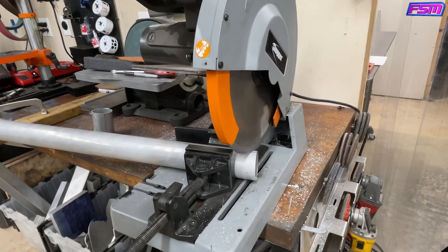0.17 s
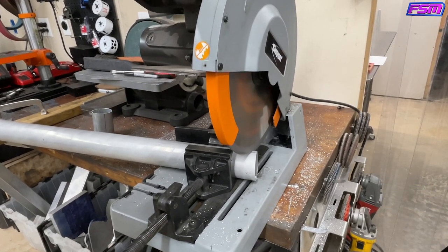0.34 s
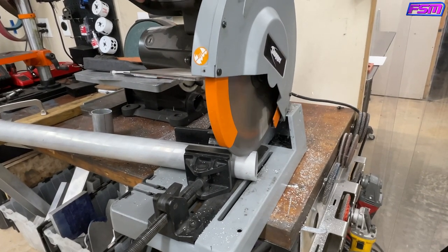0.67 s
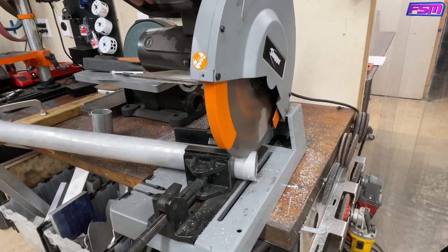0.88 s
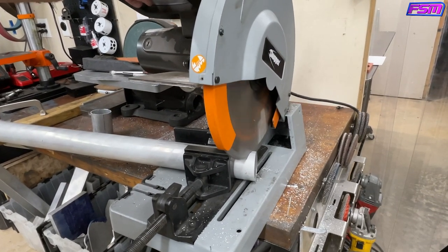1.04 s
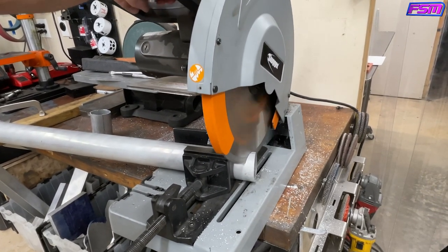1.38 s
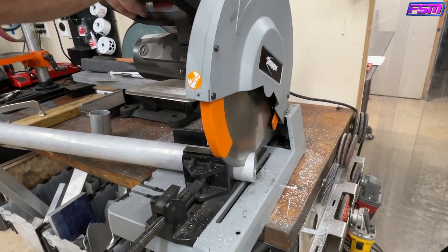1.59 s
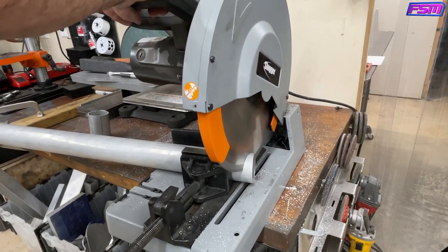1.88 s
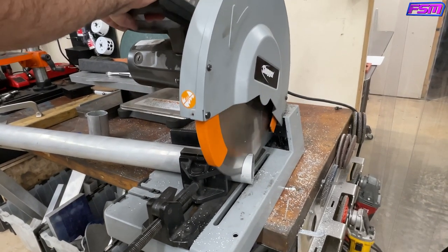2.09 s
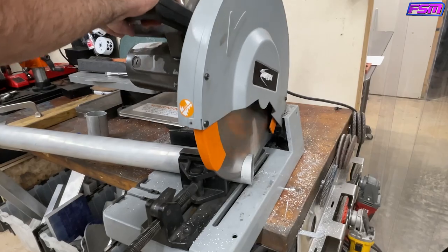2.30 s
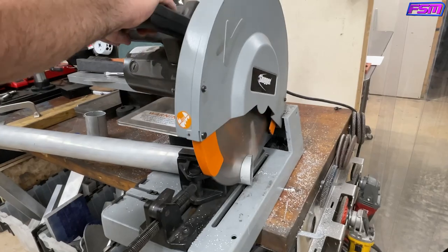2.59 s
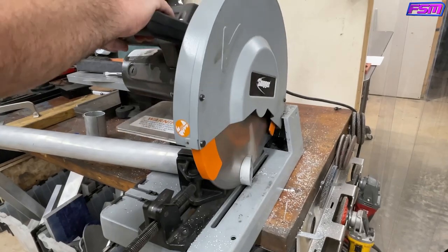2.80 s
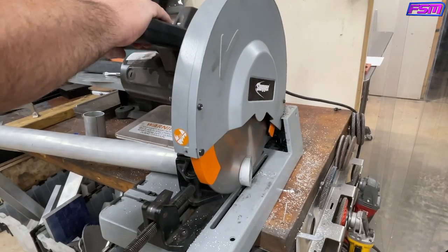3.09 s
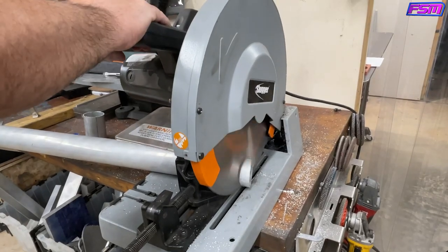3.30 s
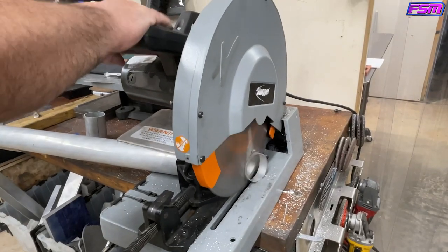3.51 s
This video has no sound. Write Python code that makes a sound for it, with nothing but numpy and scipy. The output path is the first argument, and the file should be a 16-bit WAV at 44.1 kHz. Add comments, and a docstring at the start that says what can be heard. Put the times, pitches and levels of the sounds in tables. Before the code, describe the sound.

In a workshop, close and mono, a chop saw cuts aluminum tubing: light buzzing contact, loud shrill tooth whine with hissing chips and shifting squeals, short falling screech as the offcut breaks off, then windy motor noise.

```python
"""Toothed saw cutting an aluminium tube

Saw teeth strike at a steady rate and sing overtones that throb once a blade turn: sines with partly random gain.
Chips hiss and the tube rings: coloured noise and noise-fed resonances. At break-through the pitch sags in a short
screech, torn metal crackles and the offcut snaps free as decaying sines. Motor and blade wind, heard throughout as
noise, hum and steady tones, are left at the end. One microphone."""
import sys
import numpy as np
from scipy import signal
from scipy.fft import rfft, irfft, next_fast_len
from scipy.io import wavfile
from scipy.ndimage import uniform_filter1d, map_coordinates

SR = 44100
rng = np.random.default_rng(int(sys.argv[2]) if len(sys.argv) > 2 else 0)


def inscribe(sig):
    """Save sig as 16-bit PCM at rate SR to the path in sys.argv[1].

    A 1-D sig is mono; a 2-D sig holds one channel per row.
    Samples are clipped to [-1, 1] before scaling.
    """
    pcm = np.round(np.clip(np.atleast_2d(sig).T, -1, 1) * 32767)
    wavfile.write(sys.argv[1], SR, pcm.astype(np.int16))


N = 160965
TIME_S = np.arange(N) / SR


def amp(db):
    """Decibels to linear gain."""
    return 10 ** (np.asarray(db) / 20)


def unit(x):
    """Scale to rms 1."""
    return x / np.sqrt(np.mean(x ** 2) + 1e-20)


def curves(rows):
    """One value per sample for each column after the time."""
    knots_s, *columns = np.transpose(rows)
    return [np.interp(TIME_S, knots_s, column) for column in columns]


def between(start_s, end_s):
    """1 from start to end, with 10 ms fades."""
    gate = 1. * (TIME_S >= start_s) * (TIME_S < end_s)
    return uniform_filter1d(gate, size=441, mode="nearest")


def inside(rows):
    """1 while a table lasts, with 10 ms fades."""
    return between(rows[0][0], rows[-1][0])


def wobble(knots_hz):
    """Smooth random curve through random knots."""
    knots = rng.standard_normal(int(N * knots_hz / SR) + 4)
    return map_coordinates(knots, [np.arange(N) * knots_hz / SR])


def filtered(x, response):
    """x times a complex response of frequency."""
    size = next_fast_len(N + SR // 2)
    spectrum = rfft(x, size) * response(np.fft.rfftfreq(size, 1 / SR))
    return irfft(spectrum, size)[..., :N]


def noise(spectrum, patchy_db):
    """Coloured noise of rms 1 with time-frequency patches of random gain."""
    knots_hz, knots_db = np.transpose(spectrum)
    cells = signal.stft(rng.standard_normal(N), nperseg=512)[2]
    patches = uniform_filter1d(rng.standard_normal(cells.shape), size=2, axis=0)
    patches = uniform_filter1d(patches, size=7, axis=1)
    patchy = signal.istft(cells * amp(patchy_db * unit(patches)), nperseg=512)[1][:N]
    return unit(filtered(patchy, lambda hz: amp(np.interp(np.log(hz + 1), np.log(knots_hz + 1), knots_db))))


def band(center_hz, width_hz):
    """Noise of rms 1 through one narrow resonance, applied twice."""
    def response(hz):
        damping = 1j * hz * width_hz
        return (damping / (center_hz ** 2 - hz ** 2 + damping)) ** 2
    return unit(filtered(rng.standard_normal(N), response))


def ringing(modes, fade_db, knots_hz):
    """Noise-fed resonances, each fading in and out on its own."""
    return sum(amp(db + fade_db * wobble(knots_hz)) * band(hz, width_hz) for hz, width_hz, db in modes)


def tone(cycles, level_db, rough, knots_hz):
    """Sine whose power share `rough` has random strength and phase, breaking it into beads."""
    random_gain = unit(wobble(knots_hz)) + 1j * unit(wobble(knots_hz))
    gain = np.sqrt(1 - rough) + np.sqrt(rough / 2) * random_gain
    carrier = np.exp(2j * np.pi * (cycles + rng.random()))
    return np.sqrt(2) * amp(level_db) * (gain * carrier).real


# tooth strikes: (time [s], rate [teeth/s])
TOOTH_RATE = [(0, 1820), (.3, 1826), (.5, 1824), (.85, 1827), (1.0, 1830), (1.15, 1836), (1.45, 1840),
              (2.1, 1840), (2.3, 1835), (2.55, 1831), (2.76, 1818), (2.9, 1808), (3.0, 1802), (3.1, 1792),
              (3.17, 1786), (3.23, 1765)]


def tooth_cycles():
    """Running count of tooth strikes: phase of the tooth-rate fundamental."""
    return np.cumsum(curves(TOOTH_RATE)[0]) / SR


# cut strength: (time [s], chip hiss level before gain [dB], treble hiss level before gain [dB], throb [dB])
CUT = [(0, -54, -70, 2.5), (.04, -58.5, -72, 6.5), (.45, -51.5, -60, 3.5), (.7, -50.5, -60, 2.5),
       (1.0, -47, -59.5, 1.5), (1.3, -45, -55.5, 2), (1.56, -45.5, -55.5, 1.5), (1.75, -45.5, -53, 1.5),
       (1.9, -45.5, -53.5, 1), (2.1, -49, -54.5, 1), (2.33, -45.5, -55.5, 0.5), (2.45, -44, -55.5, 0.5),
       (2.6, -45.5, -56.5, 0.5), (2.8, -46.5, -58, 1), (3.05, -49, -61.5, 1.5), (3.21, -46.5, -60, 2.5),
       (3.245, -44.5, -56, 2), (3.32, -46, -58.5, -3.5), (3.36, -44.5, -58, 1), (3.4, -51.5, -67, 0),
       (3.46, -62, -82, -2)]
TOOTH_COUNT, TURN_START_TURNS = 90, 0.061


def blade_throb(cycles, throb_db):
    """Run-out of the blade: level swing in dB, one cosine a turn."""
    return throb_db * np.cos(2 * np.pi * (cycles / TOOTH_COUNT + TURN_START_TURNS))


# tooth tones: (time [s], level of overtones 1 to 8 [dB] x 8, of lower half-way tones [dB], of upper ones [dB])
TEETH = [(0.0, -57, -50, -51, -51, -59, -61, -68, -67, -61, -62),
         (0.02, -60, -56, -60.5, -59, -70, -70, -78, -73, -67, -59),
         (0.29, -39, -53.5, -54, -57, -71, -67, -71, -66, -67, -62),
         (0.41, -47.5, -48.5, -67, -48.5, -66, -61, -61, -61, -66, -67),
         (0.53, -32.5, -45.5, -58, -57, -68, -52, -72, -49, -69, -57),
         (0.66, -36.5, -40, -44, -52, -48, -49, -55, -55, -61, -58),
         (0.73, -43, -42, -43.5, -49, -59, -49, -51, -46, -59, -57),
         (0.81, -30.5, -37.5, -43, -46, -50, -50, -53, -43, -53, -52),
         (0.84, -30, -38, -42, -47, -54, -46, -44, -42, -54, -54),
         (0.91, -31, -40.5, -39, -51, -53, -50, -52, -46, -55, -57),
         (1.0, -35, -37, -45, -46, -50, -61, -46, -44, -51, -60),
         (1.04, -45, -38.5, -31, -46.5, -49, -43, -44, -50, -46, -57),
         (1.2, -32.5, -39.5, -36.5, -38, -42, -63, -61, -40, -44, -54),
         (1.21, -32.5, -52, -33, -46, -40, -49, -50, -45, -49, -52),
         (1.27, -31.5, -54, -55, -38.5, -58, -65, -58, -43, -48, -60),
         (1.34, -32, -52, -32, -45, -54, -44, -50, -40, -41, -43),
         (1.37, -31, -50, -34, -44, -42, -44, -55.5, -40, -39, -42),
         (1.44, -32, -36.5, -32, -32, -43, -47, -51, -50, -44, -46),
         (1.49, -32.5, -39.5, -42, -40, -46, -51, -59, -48, -51, -51),
         (1.53, -33, -40, -39.5, -34, -38.5, -41, -47, -47, -50, -52),
         (1.58, -36, -40, -34.5, -45, -53, -49, -55, -45, -49, -51),
         (1.63, -30, -41, -35, -32, -43, -42.5, -48, -48, -47, -53),
         (1.75, -38, -34, -46, -29, -41.5, -36, -44, -30, -45, -43.5),
         (1.81, -32, -32, -33.5, -30.5, -44, -40, -54, -35, -39, -48),
         (1.87, -27.5, -47, -27, -35.5, -47, -37.5, -44, -36, -44, -53),
         (1.93, -46, -48, -32, -41, -40, -48, -50, -41, -44, -51),
         (2.02, -45.5, -39.5, -53, -47, -43.5, -47, -53, -54, -45, -42),
         (2.14, -51, -36, -37.5, -30.5, -47, -47, -63, -49, -40, -52),
         (2.3, -54, -33.5, -35.5, -37.5, -48, -46, -57, -44, -47, -54),
         (2.34, -50, -35, -31.5, -34, -47, -33.5, -44, -45, -41, -40),
         (2.38, -34.5, -54, -29.5, -39, -46, -53, -55, -51, -39, -43),
         (2.42, -38, -45, -32.5, -37.5, -46, -45, -54, -39, -45, -39),
         (2.55, -33.5, -35.5, -35, -37.5, -54, -42.5, -55, -39, -41, -55),
         (2.59, -36, -34.5, -41, -32.5, -46, -49, -49, -40, -39, -53),
         (2.64, -37, -40.5, -36, -35.5, -48, -47, -54, -43, -41, -56),
         (2.72, -34.5, -27.5, -41.5, -38, -44, -39, -48, -39, -35, -51),
         (2.75, -33.5, -31.5, -31.5, -30.5, -33.5, -43, -38, -38, -47, -43),
         (2.77, -30.5, -33.5, -44, -44, -38, -43, -49, -44, -48, -54),
         (2.85, -38, -37.5, -33.5, -41, -37, -42.5, -49, -38, -52, -57),
         (2.89, -38, -39, -33, -49, -54, -47, -50, -55, -54, -45),
         (2.96, -39.5, -33.5, -44, -65, -54, -43.5, -52, -49, -54, -37),
         (3.02, -48.5, -31, -51, -49, -43.5, -44, -63, -44, -61, -46),
         (3.09, -44.5, -42.5, -47, -37.5, -54, -59, -58, -47, -48, -61),
         (3.23, -47.5, -49, -50, -63, -63, -58, -63, -51, -50, -57)]
# overtones: (multiple of tooth rate, throb depth [factor], roughness [0-1])
OVERTONES = [(1, 1.4, .01), (2, 1.5, .05), (3, 1.9, .05), (4, 1.4, .07), (5, 2.0, .16), (6, 1.7, .16),
             (7, 1.7, .2), (8, 1.5, .1)]
# lower half-way tones: (multiple of tooth rate, relative level [dB])
HALVES_LOW = [(1.5, -13.5)]
# upper half-way tones: (multiple of tooth rate, relative level [dB])
HALVES_HIGH = [(5.5, -6), (6.5, -18), (7.5, -15), (8.5, -11)]


def tooth_tones(cycles, throb):
    """Periodic strikes: overtones of the tooth rate plus half-way tones, with the blade throb."""
    *overtones_db, low_db, high_db = curves(TEETH)
    out = np.zeros(N)
    for (k, depth, rough), db in zip(OVERTONES, overtones_db):
        # level unsteadiness grows with the multiple
        level_db = db + depth * throb + 0.21 * k * wobble(35.05)
        out += tone(k * cycles, level_db, rough, knots_hz=95)
    for stack_db, stack in ((low_db, HALVES_LOW), (high_db, HALVES_HIGH)):
        for k, db in stack:
            out += tone(k * cycles, stack_db + db + throb, rough=.2, knots_hz=60)
    return inside(TEETH) * out


# half-way squeals: (time [s], level at each of the three multiples [dB] x 3)
SQUEALS = [(0, -68, -72, -79), (.55, -57, -66, -73), (.8, -62, -53, -70), (1.05, -54, -51, -55),
           (1.25, -43.5, -52, -50), (1.4, -46, -52, -56), (1.55, -57, -48, -50), (1.68, -49, -48, -53),
           (1.85, -46, -45, -53), (1.97, -54, -46, -43), (2.1, -47, -45, -50), (2.26, -39, -46, -48),
           (2.33, -47, -42, -41), (2.42, -52, -38, -48), (2.52, -49, -40, -56), (2.59, -39, -30.5, -55),
           (2.67, -48, -35, -52), (2.75, -49, -50, -51), (2.86, -47, -57, -68), (3.0, -62, -59, -60),
           (3.23, -60, -53, -60)]
# (multiples of tooth rate)
SQUEAL_MULTIPLES = (2.5, 3.5, 4.5)


def squeals(cycles, throb):
    """Half-way tones of the tooth rate that swell on their own."""
    tones = sum(tone(k * cycles, db + throb, rough=.12, knots_hz=60)
                for k, db in zip(SQUEAL_MULTIPLES, curves(SQUEALS)))
    return inside(TEETH) * tones


# lines that sound for a while during the cut: (start [s], end [s], frequency [Hz], unsteadiness [Hz], level
# [dB])
RINGS = [(0, 1.2, 3816, 10, -58), (0, 0.227, 3360, 40, -55), (3.462, 3.593, 289, 30, -74),
         (0, 1.1, 2200, 13.2, -57), (0.343, 1.145, 3213, 46.1, -48), (0.304, 1.308, 2596, 19, -55.5),
         (0.353, 0.737, 5050, 26, -51.5), (.38, .9, 6900, 23, -62), (1.12, 1.45, 5150, 36, -47),
         (1.248, 1.9, 6060, 50, -47.5), (1.54, 1.608, 2760, 25, -47), (1.91, 2.007, 2750, 34, -46),
         (2.016, 2.246, 5095, 30, -48), (2.08, 2.247, 4100, 52, -47), (2.2, 2.35, 6860, 40, -45),
         (2.5, 3.05, 6130, 17, -60), (.35, .65, 10420, 31, -58.5), (1.35, 1.65, 10560, 50, -52),
         (1.85, 2.2, 10540, 63, -48), (2.653, 3.1, 2180, 19, -48.5), (2.676, 3.084, 2696, 34.6, -51.5),
         (2.81, 2.98, 3333, 33, -46.5), (3.14, 3.217, 4200, 30, -56), (3.134, 3.3, 6940, 46, -50),
         (3.236, 3.285, 5940, 46, -38.5), (3.238, 3.27, 8390, 92, -40.5), (3.257, 3.314, 6750, 58, -45),
         (3.39, 3.463, 6030, 8, -53), (3.53, 3.6, 6020, 11.95, -60), (3.205, 3.42, 260, 52, -69.5)]


def passing_lines(throb):
    """Lines that sound for a while during the cut: unsteady sines at fixed pitch."""
    return sum(between(start_s, end_s) * tone(hz * TIME_S, db + 1.8 * throb, rough=.3, knots_hz=2 * unsteady_hz)
               for start_s, end_s, hz, unsteady_hz, db in RINGS)


# chip spectrum: (frequency [Hz], relative density [dB per Hz])
CHIPS = [(530, -44.5), (900, -34), (995, -9), (1620, -22), (1820, -2), (2950, -18), (3580, -3), (3890, -8),
         (5400, -4.5), (8000, -13), (10400, -22), (17600, -120)]
# tube modes: (frequency [Hz], width [Hz], relative level [dB])
TUBE = [(1704, 134, -13.5), (3248, 300, -10.5), (4140, 64, -8.5), (5880, 67, -18.5)]
CHIPS_GAIN_DB, TUBE_GAIN_DB = 7.5, 3


def chips_and_tube(hiss_db, throb):
    """Flickering chip noise and noise-fed tube modes under one cut level."""
    chips = amp(CHIPS_GAIN_DB + 1.94 * wobble(300)) * noise(CHIPS, patchy_db=2.5)
    tube = amp(TUBE_GAIN_DB) * ringing(TUBE, fade_db=4, knots_hz=8.13)
    return inside(CUT) * amp(hiss_db + 0.22 * throb) * (chips + tube)


# treble hiss spectrum: (frequency [Hz], relative density [dB per Hz])
FIZZ = [(4120, -32.5), (7000, -4.5), (7070, 1), (7490, -1.5), (7810, -9.5), (9610, -4.5), (10800, -1),
        (12200, -9.5), (15200, -4), (15800, -24)]
FIZZ_GAIN_DB = 14.5


def treble_hiss(treble_db, throb):
    """Treble chip noise, its level throbbing and gently unsteady."""
    level_db = treble_db + FIZZ_GAIN_DB + .5 * throb + .7 * wobble(40)
    return inside(CUT) * amp(level_db) * noise(FIZZ, patchy_db=2)


def cut():
    """Tooth tones, squeals, rings and hiss sharing one blade run-out."""
    hiss_db, treble_db, throb_db = curves(CUT)
    cycles = tooth_cycles()
    throb = blade_throb(cycles, throb_db)
    tones = tooth_tones(cycles, throb) + squeals(cycles, throb) + passing_lines(throb)
    return tones + chips_and_tube(hiss_db, throb) + treble_hiss(treble_db, throb)


# sliding squeal: (time [s], nominal pitch [Hz], level [dB])
SLIDE = [(3.09, 3520, -52), (3.125, 3390, -48), (3.175, 3350, -39), (3.2, 3230, -39), (3.235, 3350, -46)]
# sagging screech: (time [s], fundamental [Hz], reference level [dB])
SCREECH = [(3.21, 876.8, -51), (3.232, 866.6, -38), (3.25, 854.8, -29.5), (3.278, 838.4, -32.5),
           (3.308, 823.2, -28), (3.328, 818.3, -44), (3.356, 813.4, -31.5), (3.392, 826.5, -72),
           (3.4, 791.1, -57)]
# screech overtones: (multiple, relative level [dB])
SCREECH_TONES = [(2, -36), (3, -18), (4, -0.5), (5, -12), (6, -16), (7, -14), (8, -11), (9, -23), (12, -20),
                 (13, -23)]
# low chirp as the cut ends: (time [s], pitch [Hz], level [dB])
DROOP = [(3.315, 1740, -50), (3.335, 1695, -41), (3.35, 1610, -38), (3.362, 1600, -46), (3.385, 1600, -54)]


def break_through_screech():
    """Sliding squeal, chattering sagging screech and low chirp: rough sines on gliding pitch."""
    out = np.zeros(N)
    for rows, stack in ((SLIDE, [(0.99, 0)]), (SCREECH, SCREECH_TONES), (DROOP, [(1, 0)])):
        hz, level_db = curves(rows)
        cycles = np.cumsum(hz) / SR
        for k, db in stack:
            rough = .1 if k == 4 else .35
            out += inside(rows) * tone(k * cycles, level_db + db, rough, knots_hz=120)
    return out


# crackle level: (time [s], level [dB])
TEAR = [(3.225, -52), (3.25, -42), (3.3, -42), (3.33, -48), (3.36, -41), (3.39, -54)]


def tear():
    """Last strip of wall ripping: treble noise with fast random gain."""
    spectrum = [(3000, -30), (5500, 0), (10000, -5), (15800, -10)]  # (Hz, dB per Hz)
    spikes = amp(6 * wobble(400)) * noise(spectrum, patchy_db=3)
    return inside(TEAR) * amp(curves(TEAR)[0]) * unit(spikes)


# offcut modes: (frequency [Hz], relative level [dB], 60 dB decay [s])
SNAP = [(3270, -3, .08), (4855, 0, .15), (6490, -7, .05), (11030, -16, .2)]
SNAP_S, SNAP_DB, SNAP_ATTACK_S = 3.349, -28, 0.004


def offcut_snap():
    """Offcut snapping free: decaying sine modes with a soft attack."""
    since_s = np.maximum(TIME_S - SNAP_S, 0)
    modes = sum(amp(SNAP_DB + db - 60 * since_s / t60_s) * np.sin(2 * np.pi * hz * since_s)
                for hz, db, t60_s in SNAP)
    return modes * (1 - np.exp(-since_s / SNAP_ATTACK_S))


# motor and wind spectrum: (frequency [Hz], relative density [dB per Hz])
MOTOR = [(59, -75), (100, -34), (156, -20), (254, -21.5), (288, -18.5), (431, -9), (533, -5), (659, -7),
         (905, -4.5), (1010, 2), (1300, -0.5), (1640, 0.5), (3510, -5.5), (3740, -3), (5360, -9),
         (5840, -9), (6350, -11.5), (9910, -15.5), (15800, -27)]
# motor noise: (time [s], level before gain [dB])
MOTOR_DB = [(0.0, -56.5), (0.04, -54.5), (2.56, -57), (2.83, -54.5), (2.92, -55.5), (3.65, -56)]
# hum and blade ring: (frequency [Hz], width [Hz], relative level [dB])
HUM = [(394.2, 23, -15), (605.6, 28, -9), (1032, 50, -3.5), (3803, 13, -7), (9620, 62, -11),
       (10500, 120, -9)]
# steady motor tones: (start [s], end [s], frequency [Hz], level [dB])
MOTOR_TONES = [(0, 2.9, 317.4, -81), (2.5, 3.12, 827, -62.5)]
# free blade tones: (frequency [Hz], level [dB])
FREE_BLADE = [(3770, -61), (9640, -68), (11030, -69)]
MOTOR_GAIN_DB, HUM_DB = 10.5, -58.5


def motor():
    """Motor, gears and blade wind: coloured noise, resonant hum, tones and faint free-blade ring."""
    level_db, = curves(MOTOR_DB)
    wind = amp(level_db + MOTOR_GAIN_DB) * noise(MOTOR, patchy_db=2.0)
    hum = amp(HUM_DB) * ringing(HUM, fade_db=3, knots_hz=13)
    tones = sum(between(start_s, end_s) * tone(hz * TIME_S, db, rough=.1, knots_hz=15)
                for start_s, end_s, hz, db in MOTOR_TONES)
    blade = sum(tone(hz * TIME_S, db + 3 * wobble(12), rough=.25, knots_hz=51) for hz, db in FREE_BLADE)
    return wind + hum + tones + blade


def scene():
    """Sum of all sources, same signal in both channels."""
    mono = cut() + break_through_screech() + tear() + offcut_snap() + motor()
    return np.array([mono, mono])


BASS_CUT_HZ, TOP_HZ = 50, 15750


def record(dry):
    """Microphone: deep bass rolls off, nothing passes above the band limit."""
    def response(hz):
        bass = (hz / BASS_CUT_HZ) ** 2
        return (hz < TOP_HZ) * bass / (1 + bass)
    return filtered(dry, response)


dry = scene()
out = record(dry)
inscribe(out)
```